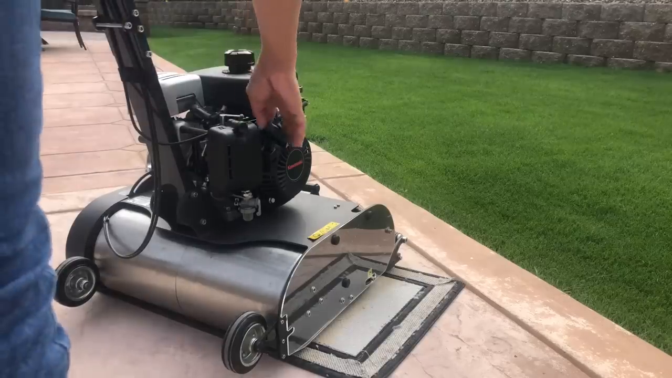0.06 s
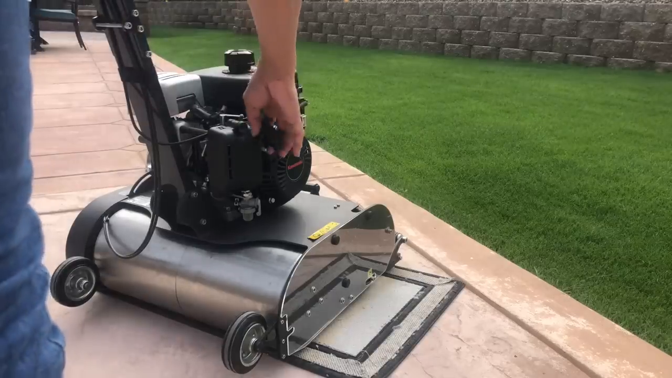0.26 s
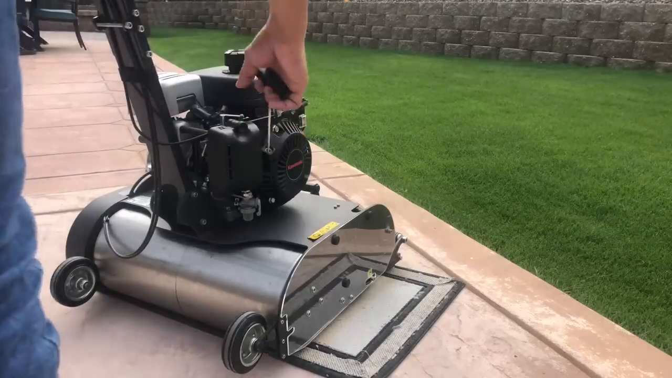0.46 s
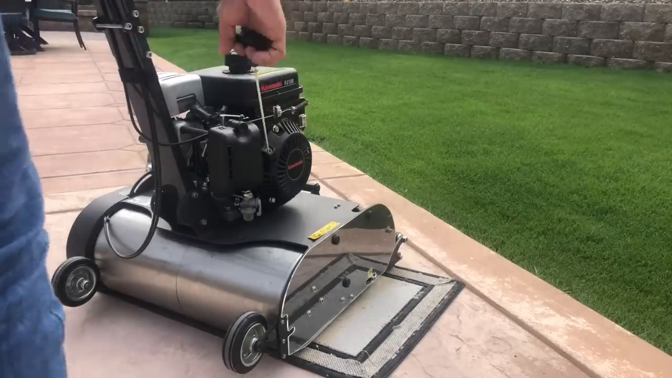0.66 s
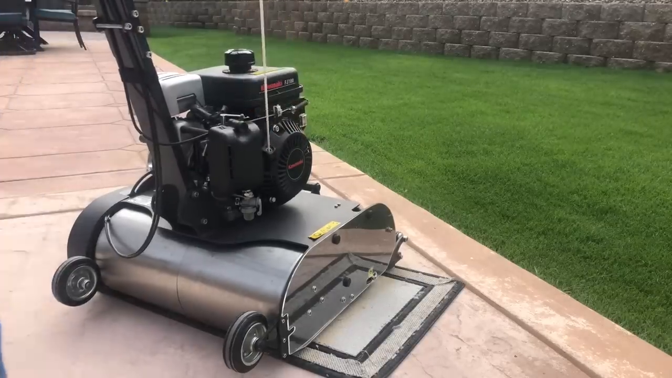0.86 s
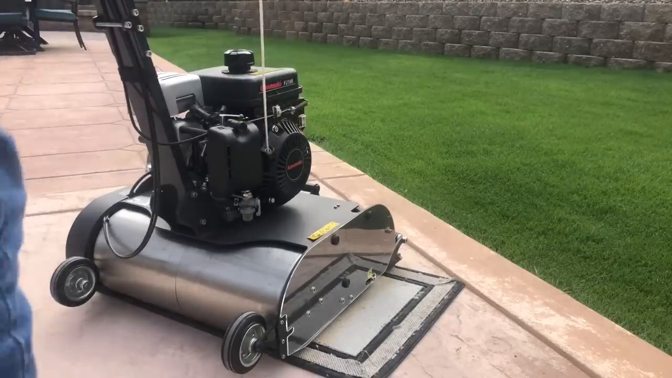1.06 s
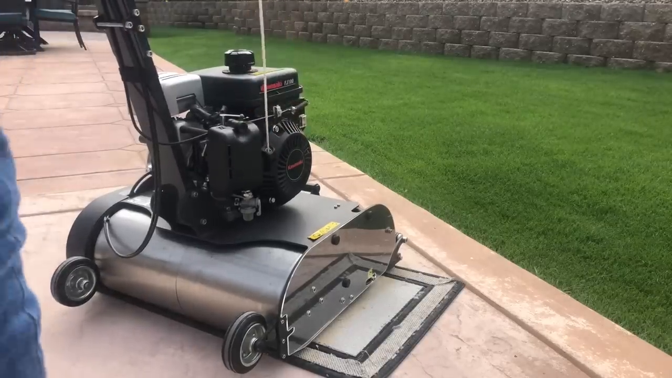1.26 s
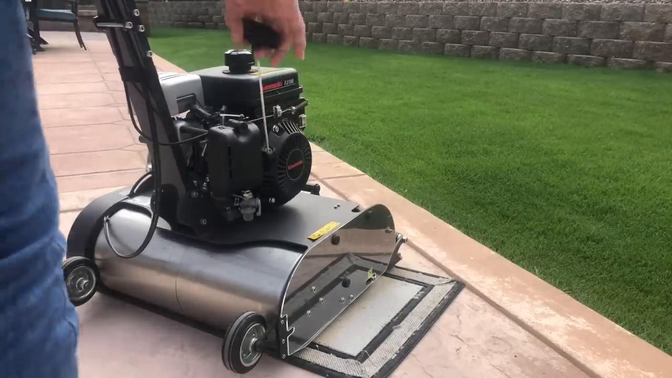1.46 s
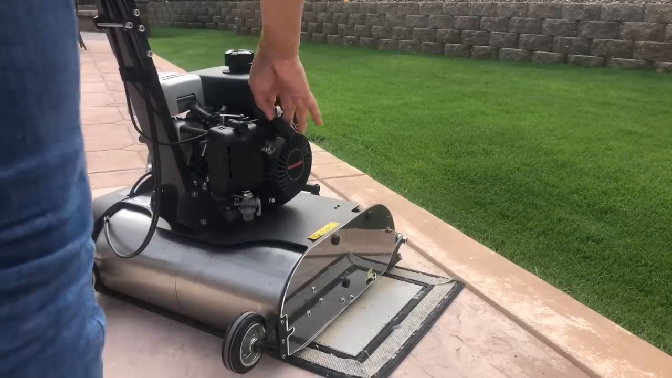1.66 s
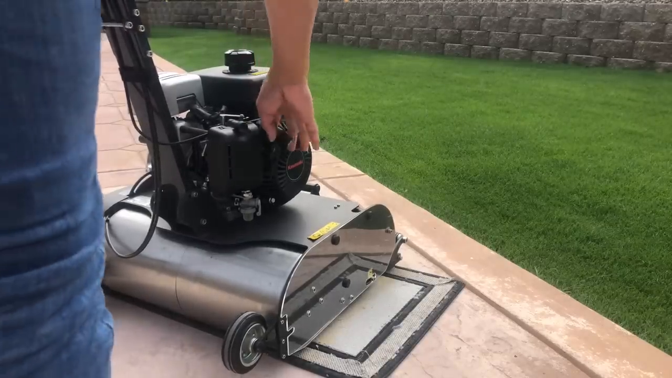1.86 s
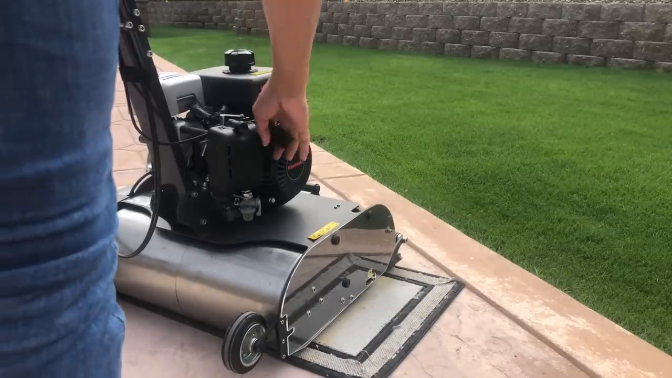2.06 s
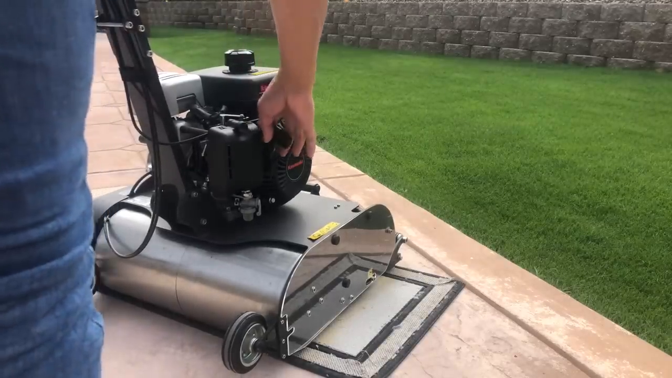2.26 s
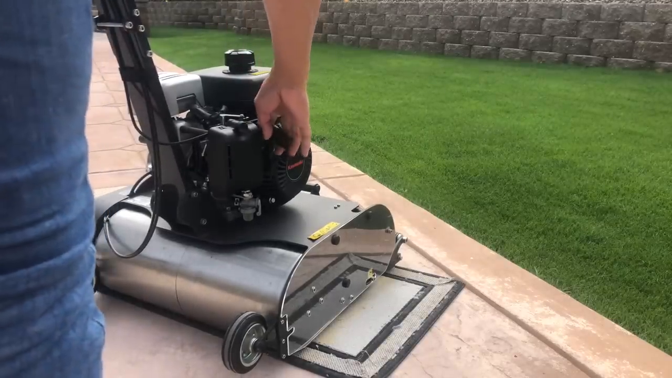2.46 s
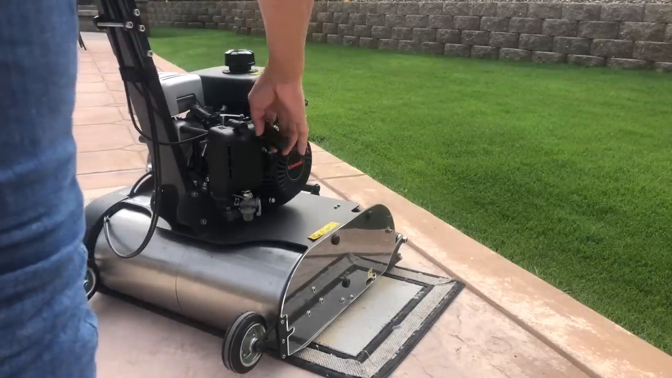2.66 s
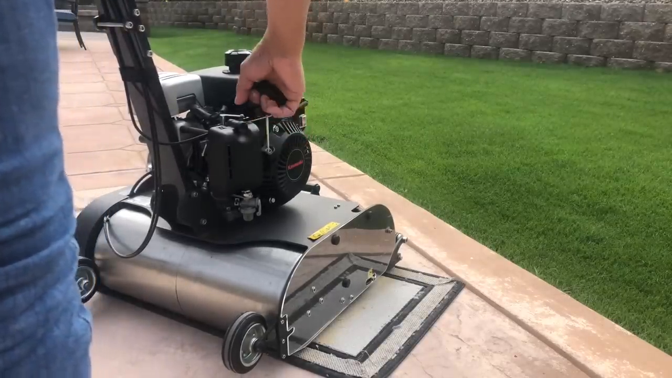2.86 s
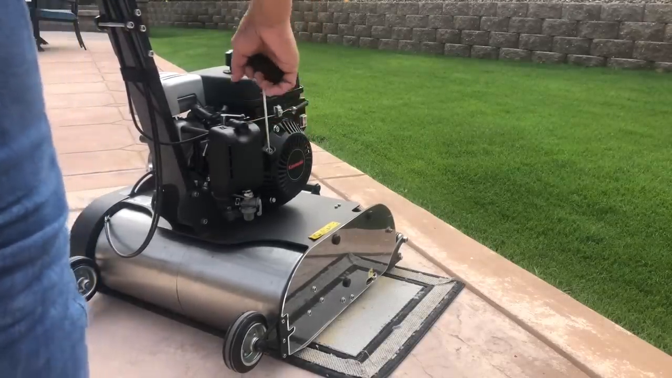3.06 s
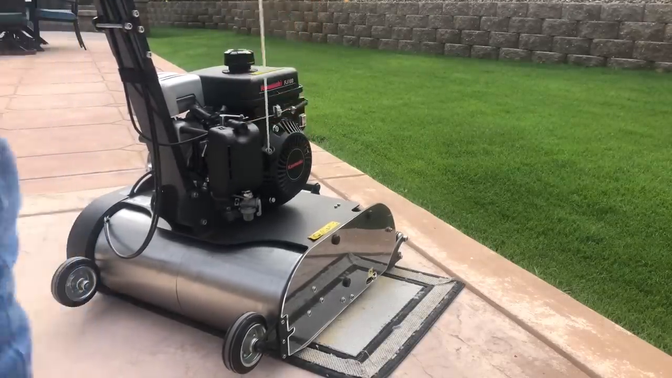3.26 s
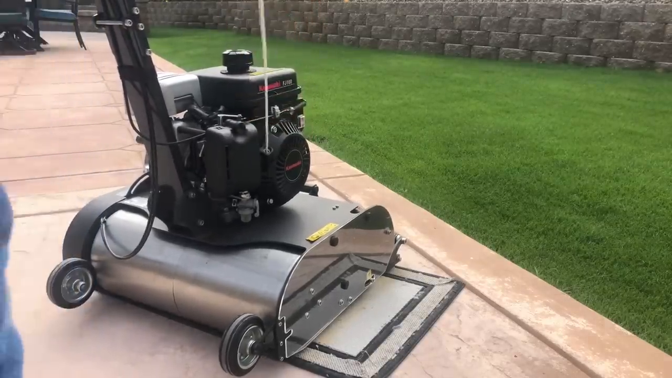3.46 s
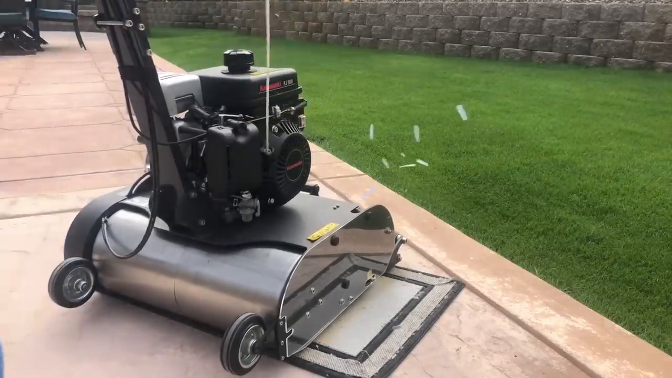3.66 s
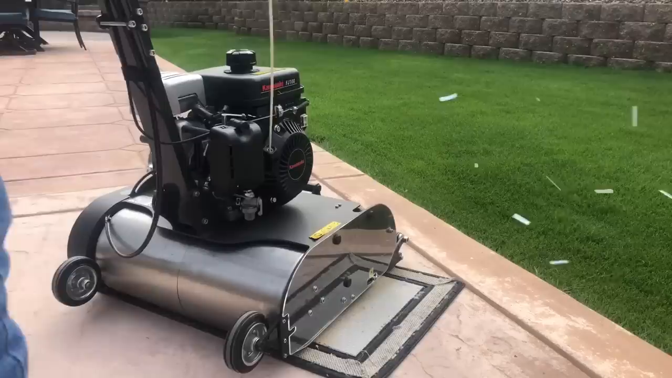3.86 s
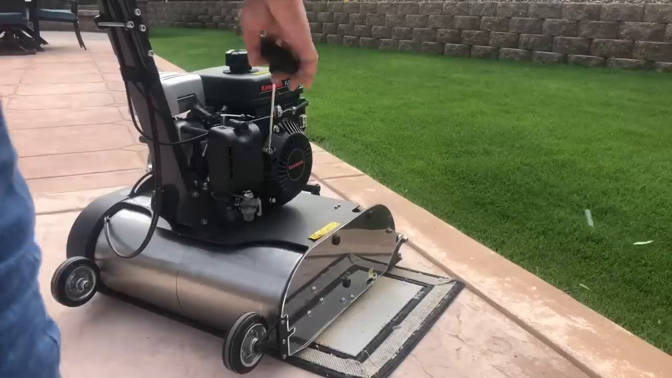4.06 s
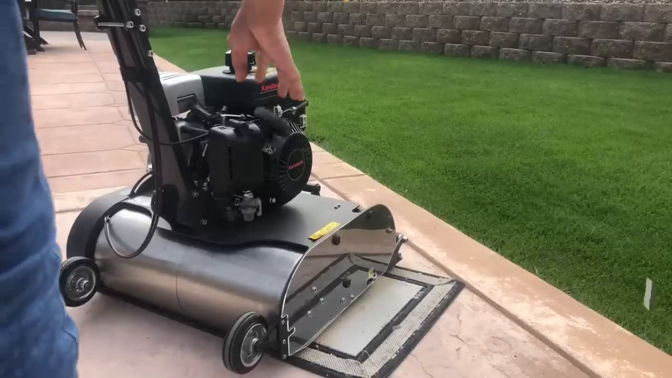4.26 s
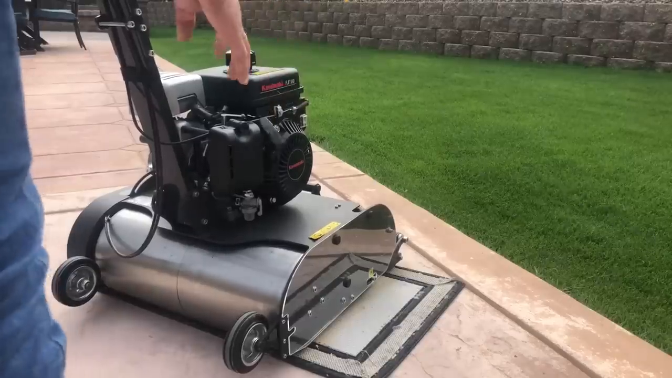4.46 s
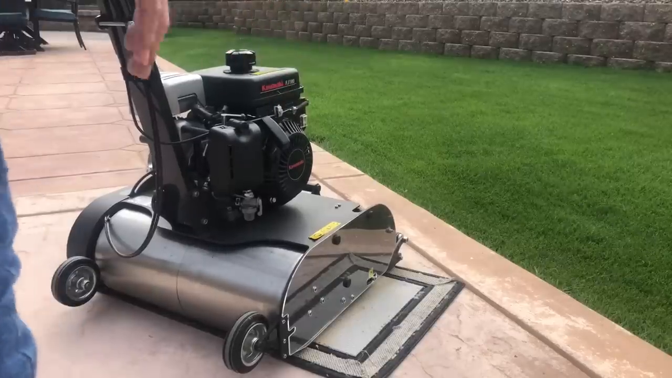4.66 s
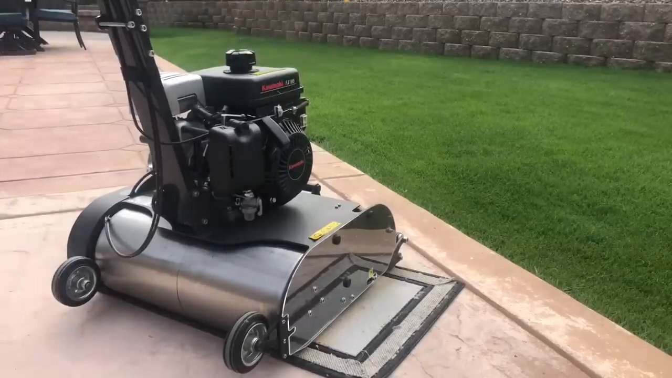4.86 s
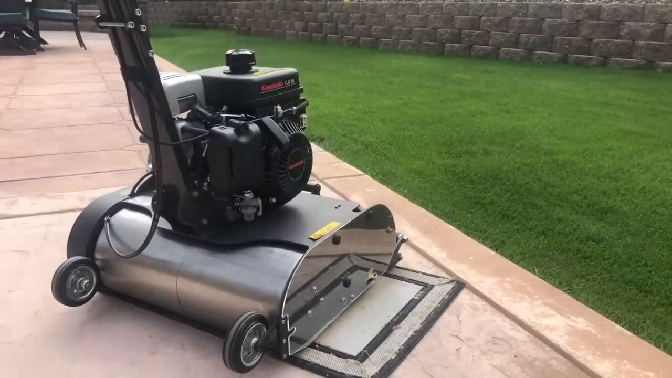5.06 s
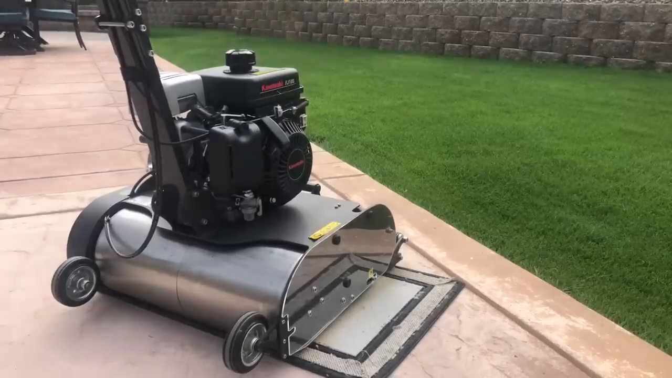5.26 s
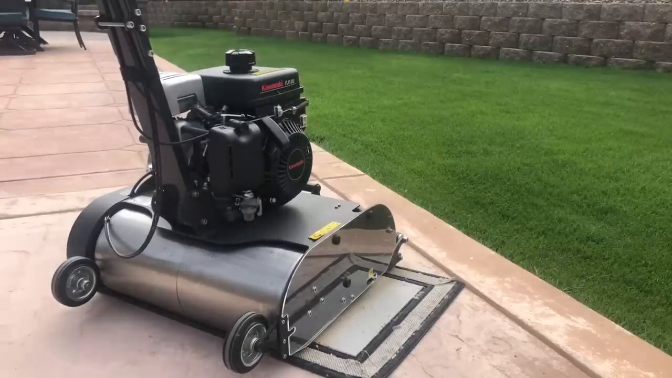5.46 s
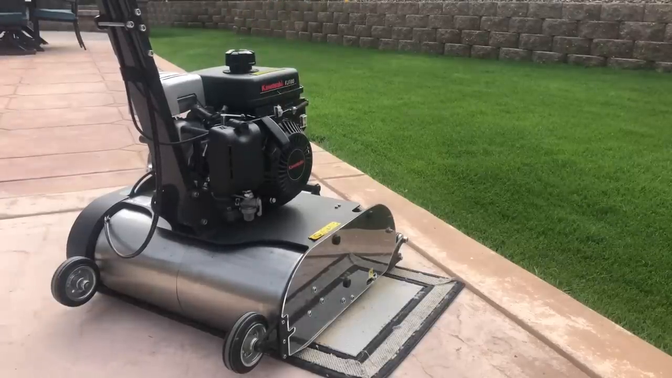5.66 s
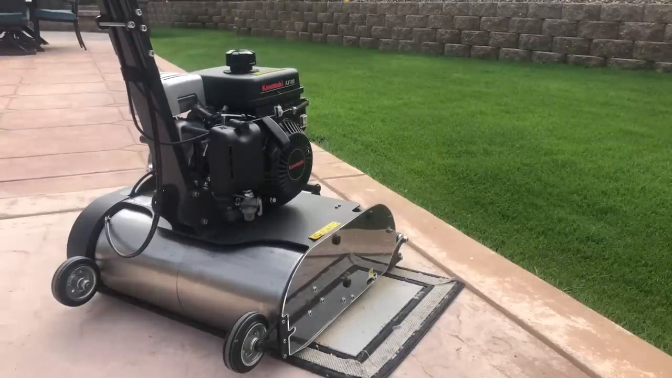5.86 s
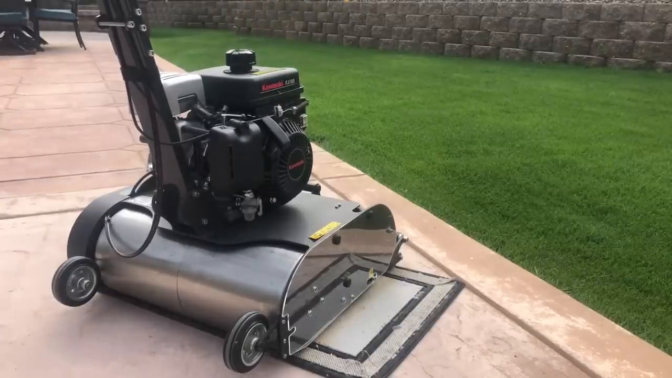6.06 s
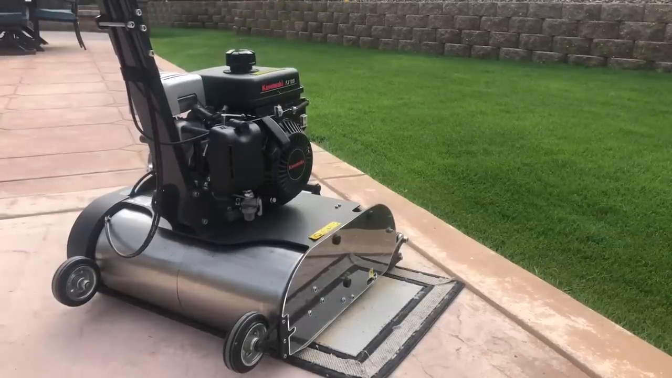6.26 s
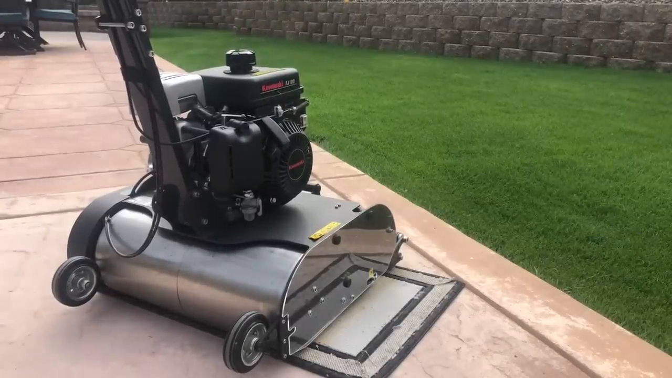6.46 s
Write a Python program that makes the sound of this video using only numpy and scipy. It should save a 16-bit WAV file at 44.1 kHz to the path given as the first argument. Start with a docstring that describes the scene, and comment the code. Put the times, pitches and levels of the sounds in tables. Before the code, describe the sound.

A small petrol mower is started close to the microphone on a paved patio. First come a faint bird chirp, low wind rumble and sharp metal clicks, then a rasping rope pull that fails. After more knocks, a second pull brings the engine to life. It runs loudly with rapid barking beats, the starter handle knocks home, and it eases into a steady, thumping, rattling idle.

```python
"""First you hear wind bumping the microphone over a quiet garden, and a bird chirping far off.
Then a small petrol engine on a paved patio is pulled over twice by its starter rope: the pawls
(small steel catches) click, the rope whirrs, the handle knocks home. At the second pull the engine
catches and fires on nearly every turn, then settles to firing every other turn. Each firing thumps
in the muffler, barks through the metal casing and rings the cooling fins."""
import sys
import numpy as np
from scipy import signal
from scipy.fft import rfft, irfft, next_fast_len
from scipy.io import wavfile
from scipy.ndimage import uniform_filter1d, map_coordinates

SR = 44100
rng = np.random.default_rng(int(sys.argv[2]) if len(sys.argv) > 2 else 0)


def log_audio(samples):
    """Write samples as a 16-bit WAV file to the path given in sys.argv[1]."""
    # one column per channel
    frames = np.atleast_2d(samples).T
    # limit to full scale, then quantise
    limited = np.clip(frames, -1, 1)
    pcm = np.round(limited * 32767).astype(np.int16)
    wavfile.write(sys.argv[1], SR, pcm)


N = 287532


def amp(db):
    """Turns decibels into a gain; amp(-60 * t / x) dies away in x seconds, its ring time."""
    return 10 ** (np.asarray(db) / 20)


def unit(x):
    """Scales x to an average (rms) level of 1."""
    return x / np.sqrt(np.mean(x ** 2) + 1e-20)


def along(points, hz):
    """Reads between (frequency, value) points on a log frequency axis."""
    freqs, values = np.transpose(points)
    return np.interp(np.log(hz + 1), np.log(freqs + 1), values)


def curves(rows):
    """One value per sample for each column after the time."""
    times, *columns = np.transpose(rows)
    return [np.interp(np.arange(N) / SR, times, column) for column in columns]


def wobble(rate):
    """A smooth curve through `rate` random values a second."""
    return map_coordinates(rng.standard_normal(int(N * rate / SR) + 4), [np.arange(N) * rate / SR])


def filtered(x, response):
    """Gives each frequency in x the gain that `response` sets for it."""
    size = next_fast_len(N + SR // 2)
    return irfft(rfft(x, size) * response(np.fft.rfftfreq(size, 1 / SR)), size)[..., :N]


def noise(spectrum, peaks=(), lift_db=0):
    """Noise of level 1 with this tone colour, raised around each (pitch, width, level) peak."""
    def bumps(f):
        return 1 + sum(amp(db + lift_db) / (1 + (2 * (f - hz) / width) ** 2) for hz, width, db in peaks)
    return unit(filtered(rng.standard_normal(N), lambda f: amp(along(spectrum, f)) * bumps(f)))


def add(track, s, piece):
    """Mixes a piece in at s seconds."""
    part = track[round(s * SR):][:len(piece)]
    part += piece[:len(part)]


def swell(s, length):
    """Start time and smooth hump of a puff centred on s."""
    return s - length / 2, np.hanning(max(round(length * SR), 8))


def even(x, span_s):
    """Takes the slow swings of level out of x."""
    return x / np.sqrt(np.abs(uniform_filter1d(x ** 2, size=round(span_s * SR))) + 1e-9)


def glide(rows, waver, overtone_db):
    """A trembling tone and its octave, following (time, pitch, level) rows; silent outside them."""
    hz, db = curves(rows)
    t = np.arange(N) / SR
    phase = 2 * np.pi * np.cumsum(hz * (1 + waver * wobble(200))) / SR
    sounding = (t > rows[0][0]) & (t < rows[-1][0])
    return sounding * amp(db + 3.1 * wobble(80)) * (np.sin(phase) + amp(overtone_db) * np.sin(2 * phase))


def patchy(x, depth_db):
    """Random loud and soft patches in time and pitch, like a loose part that never rattles twice alike."""
    spectrum = signal.stft(x, nperseg=256)[2]
    patches = uniform_filter1d(rng.standard_normal(spectrum.shape), size=3, axis=0)
    patches = uniform_filter1d(patches, size=6, axis=1)
    return unit(signal.istft(spectrum * amp(depth_db * unit(patches)), nperseg=256)[1][:N])


def ring(notes, t, spread_db):
    """One blow on a part: its notes die away, their levels varied at random by spread_db."""
    return sum(amp(db + rng.normal(0, spread_db) - 60 * t / ring_s)
               * np.sin(2 * np.pi * hz * rng.normal(1, 0.0043) * t) for hz, db, ring_s in notes)


# Tone colour of the garden (frequency [Hz], relative level [dB])
HUSH_COLOUR = [(180, -120), (300, 2), (600, 2), (1000, 2.5), (1500, -6), (2500, -16.5), (4500, -16.5),
               (8000, -25.5), (14000, -32), (16000, -40)]
def garden_hush():
    """A faint background hiss that drifts a little in level."""
    return amp(-63.5 + wobble(2.7)) * noise(HUSH_COLOUR)


# Tone colours of the wind's rumble and of a gust's sharp edge (frequency [Hz], relative level [dB])
RUMBLE_COLOUR = [(15, -41.5), (25, -13), (70, -2), (170, -1), (395, -16.5), (522, -37), (568, -43),
                 (700, -32), (910, -64), (1540, -120)]
FLAP_COLOUR = [(150, -120), (300, -1.5), (500, 1), (900, -18), (1500, -43), (2500, -120)]
# The strongest lumps of air (middle time [s], strength [dB], relative flap [dB], length [s])
GUSTS = [(0.048, -54, -16, 0.1), (0.21, -44.5, -23, 0.093), (0.289, -41, -18, 0.08),
         (0.515, -49, -1.5, 0.12), (0.63, -45, -21, 0.092), (1.008, -40, -9.5, 0.34),
         (1.151, -39.5, -12, 0.1), (1.409, -48, -3.5, 0.12), (1.549, -31.5, -12, 0.17),
         (1.645, -35.5, -29, 0.064), (1.723, -35.5, -24, 0.11), (1.856, -30.5, -15.5, 0.071),
         (1.997, -43, -26, 0.06), (2.075, -40.5, -26.5, 0.12), (2.143, -38.5, -19, 0.073),
         (2.244, -29, -2.5, 0.12), (2.329, -38, -11, 0.084), (2.425, -36.5, -20, 0.093),
         (2.645, -43.5, -18.5, 0.1), (2.739, -36.5, -28, 0.1), (3.046, -45, -22, 0.094),
         (3.997, -26, -36, 0.16)]
def wind():
    """Lumps of air hit the microphone over a light breeze; hard gusts flap."""
    breeze_db = -53.5
    push, flap = np.full(N, amp(breeze_db)), np.zeros(N)
    for s, db, flap_db, length in GUSTS:
        start, hump = swell(s, length)
        add(push, start, amp(db - 1.5) * hump)
        add(flap, start, amp(db + flap_db + 2) * hump ** 3)
    rumbling = even(amp(4.5 * wobble(30)) * noise(RUMBLE_COLOUR), span_s=.09)
    flapping = even(amp(5.9 * wobble(60)) * noise(FLAP_COLOUR), span_s=.05)
    return push * rumbling + flap * flapping


# The path of one chirp (time [s], pitch [Hz], relative level [dB])
CHIRP = [(.135, 4500, -73), (.155, 5040, -49), (.19, 4200, -48), (.205, 3820, -46), (.225, 3700, -48),
         (.25, 2850, -51), (.265, 2550, -57), (.285, 2790, -65), (.35, 2750, -80)]
def bird():
    """A nearly pure whistle flicks up, then slides down."""
    return glide(CHIRP, waver=.035, overtone_db=-36)


# Rope and reel rubbing through two pulls and a rewind (time [s], rub level [dB], hiss level [dB])
ROPE_LEVELS = [(0.25, -72, -71.5), (0.7, -70, -75), (0.735, -56, -54), (0.87, -39, -44), (1.0, -40.5, -44),
               (1.14, -48, -53.5), (1.36, -49.5, -55), (1.6, -60, -63.5), (1.9, -61.5, -74),
               (2.2, -79, -85), (2.86, -61.5, -68), (3.0, -58, -62), (3.15, -67, -71), (3.18, -57.5, -57),
               (3.43, -44, -40), (3.6, -90, -90)]
# Short rasps as the rope is handled or drags the engine over
# (middle time [s], level [dB], relative hiss [dB], length [s])
RASPS = [(0.369, -66.5, 9.5, 0.044), (0.48, -59, -12, 0.34), (0.854, -37.5, -7.5, 0.054),
         (0.888, -41, -7, 0.021), (0.941, -31, -2.5, 0.054), (1.403, -45, -14, 0.063),
         (2.337, -39.5, -2, 0.089), (2.372, -55.5, -9, 0.29), (2.641, -49, -6.5, 0.16),
         (3.282, -44, -1, 0.038), (3.318, -35.5, -5, 0.042), (3.357, -33.5, 3, 0.024),
         (3.387, -27.5, -4, 0.053)]
# Tone colours of the low rub and the high hiss (frequency [Hz], relative level [dB])
RUB_COLOUR = [(440, -32.5), (750, 0), (1070, 1.5), (1510, -1), (1660, 4.5), (1870, -4), (2670, -0.5),
              (4170, -14), (5000, -7), (6500, -39), (11000, -120)]
HISS_COLOUR = [(2060, -27), (3500, 4.5), (4240, -3.5), (8210, -5.5), (9810, -11.5), (13000, -10),
               (16000, -20)]
# Notes of the starter's cover, also rung by knocks (pitch [Hz], relative level [dB], ring time [s])
COVER_NOTES = [(845, -12, 0.046), (1077, -0.5, 0.046), (1235, -9, 0.04), (1760, -12.5, 0.041),
               (2340, -14.5, 0.047), (2850, -23, 0.094), (2910, -36, 0.35)]
def rope():
    """The rope rubs with a grainy sound, heard through the hollow cover."""
    rub_level, hiss_level = amp(curves(ROPE_LEVELS))
    for s, db, hiss_db, length in RASPS:
        start, hump = swell(s, length)
        add(rub_level, start, amp(db) * hump)
        add(hiss_level, start, amp(db + hiss_db) * hump)
    grain = unit(amp(3 * wobble(70) + 1.95 * wobble(400)))
    cover_peaks = [(hz, 150, db) for hz, db, _ in COVER_NOTES]
    rub = patchy(noise(RUB_COLOUR, cover_peaks, lift_db=-4.5), depth_db=4)
    return grain * (rub_level * rub + hiss_level * noise(HISS_COLOUR))


# Starter parts hitting each other
# (time [s], strength [dB], relative pawl ring [dB], relative cover ring [dB], relative fizz [dB])
KNOCKS = [(0.384, -51.5, 5, -5, 12), (0.419, -28, 6, -14, -1), (0.454, -30.5, 3.5, -8, -7),
          (0.4834, -19, -9, -8, -8.5), (0.5824, -39.5, -19, -16, -11), (0.894, -17.5, -21.5, -25, -9.5),
          (0.9672, -18.5, -12, -27, -4), (1.0224, -7, -24, -10.5, -10.5), (1.033, -15.5, 3, -25, -15),
          (1.045, -23.5, -14, 0, -22), (1.0731, -21.5, -18, -14, -16), (1.0919, -25, -5, -21, -2.5),
          (1.274, -32.5, -29.5, -8, -31), (1.3162, -28, -6, -28, -9), (1.3877, -36, -26, -1, -24.5),
          (1.4338, -23, -28, -17, -10.5), (1.479, -25, -10.5, -27, -5.5), (1.642, -36, -16, -31, -10),
          (1.652, -32.5, -13, -22, -8), (1.7779, -13, -16, 1.5, -7), (2.3232, -20, -12.5, -12, -6),
          (2.399, -44, -17, 2, -17), (2.5895, -33.5, -25, -8.5, -8), (2.6452, -25, -36.5, -7, -12),
          (2.787, -44, -11, -13, -2), (2.815, -44, -5, -9, -2), (2.8995, -25, -4, -17, -10),
          (2.9244, -26.5, -4, -12, -14), (2.9549, -26.5, -15, -14, -19), (3.3014, -26, -13, -12, -5.5),
          (3.405, -22.5, 0, -4, -4.5), (3.4752, -10, -18.5, -13, -7.5), (4.366, -15, -23, -9, -10.5),
          (4.383, -17, -18, -3, -6)]
# Notes of the steel pawl (pitch [Hz], relative level [dB], ring time [s])
PAWL_NOTES = [(3520, -5.5, 0.035), (3540, -31, 0.34), (7050, 0.5, 0.056), (7270, -0.5, 0.027),
              (9130, -9.5, 0.033), (10650, -10.5, 0.037)]
# Tone colours of a knock's slap and its bright fizz (frequency [Hz], relative level [dB])
SLAP_COLOUR = [(200, -120), (500, -13.5), (1000, -2), (3000, -4), (6000, -6.5), (9000, -23.5),
               (12000, -120)]
FIZZ_COLOUR = [(4000, -120), (6000, -25), (8000, -3.5), (12000, -11.5), (16000, -15.5)]
def starter_knocks():
    """Each contact is a burst of noise that rings the steel pawl and the cover."""
    ringing, slap, fizz = np.zeros((3, N))
    t = np.arange(SR // 4) / SR
    for s, db, pawl_db, cover_db, fizz_db in KNOCKS:
        burst = amp(db - 5 - 60 * t / .057) * (1 - np.exp(-t / 0.0016))
        add(slap, s - .001, burst)
        add(fizz, s - .001, burst * amp(fizz_db))
        build_up = 1 - np.exp(-t / 0.0023)  # the air under the cover takes a moment to get going
        add(ringing, s, amp(db + 3 + cover_db) * build_up * ring(COVER_NOTES, t, spread_db=0))
        add(ringing, s, amp(db - 3 + pawl_db) * ring(PAWL_NOTES, t, spread_db=2.5))
    slap *= patchy(noise(SLAP_COLOUR), depth_db=4.5)
    fizz *= patchy(noise(FIZZ_COLOUR), depth_db=3)
    return ringing + slap + fizz


# The moment the rope jerks tight (time [s], strength [dB])
ROPE_JERK = (.7085, -37)
def rope_pop():
    """The rope pops as it snaps tight; the pitch drops as it settles."""
    s, db = ROPE_JERK
    out, t = np.zeros(N), np.arange(SR // 4) / SR
    level = amp(db - 60 * t / 0.057) * (1 - np.exp(-t / 0.00058))
    add(out, s, level * np.sin(9 * np.log(1 + t / 0.00051)))
    return out


# When each pull speeds up (start time [s])
WHINE_STARTS = [0.745, 3.235]
def reel_whine(s):
    """The reel whines as it speeds up: the pitch climbs while the level rises, holds and falls."""
    start_hz, climb_hz_per_s, hold_db = 920, 6700, -45
    edge_s, hold_s = .02, .05
    elapsed = np.cumsum([0, edge_s, hold_s, edge_s])
    hz = start_hz + climb_hz_per_s * elapsed
    db = hold_db - 24 * np.array([1, 0, 0, 1])
    return glide(np.transpose([s + elapsed, hz, db]), waver=.05, overtone_db=-5.5)


# How hard the engine rattles (time [s], base level [dB])
RATTLE_LEVELS = [(3.28, -130), (3.38, -43), (3.46, -30), (3.7, -32.5), (4.0, -35), (4.6, -36), (6.52, -33)]
# Tone colours of the clatter and the frame's low drone (frequency [Hz], relative level [dB])
CLATTER_COLOUR = [(210, -19), (350, -0.5), (557, -3.5), (857, -2.5), (2130, -6.5), (3390, -14), (4040, -17),
                  (5570, -16), (7920, -25), (15000, -34.5), (16000, -34)]
DRONE_COLOUR = [(25, -120), (45, -5), (80, -9), (130, -3.5), (200, -2.5), (300, -0.5), (450, -14),
                (700, -120)]
# Pitches the casing boosts, in clatter and bark (pitch [Hz], width [Hz], relative level [dB])
CASING_PEAKS = [(668, 30, -7), (851, 40, -3.5), (2086, 19, -2), (2674, 57, -6), (2835, 39, -1),
                (3230, 55, -7), (3624, 330, -6.5), (4870, 34, 2.5), (5170, 34, 5.5), (7000, 630, -3.5),
                (7640, 71, -4), (8450, 64, -1.5), (11200, 110, -9), (12000, 150, -11)]
def engine_rattle(fired):
    """The engine clatters and its frame drones on the paving, both harder after each firing."""
    shake, t = np.ones(N), np.arange(SR // 5) / SR
    for s, _ in fired:
        add(shake, s, 0.5 * amp(-60 * t / 0.4))
    db = curves(RATTLE_LEVELS)[0]
    flicker_db = 1.3 * wobble(80) + 1.04 * wobble(7)
    clatter = amp(db + flicker_db) * noise(CLATTER_COLOUR, CASING_PEAKS, lift_db=-1.5)
    drone = amp(db - 7) * shake * 1 * noise(DRONE_COLOUR)
    return shake * clatter + drone


# The engine's turning, which slows as it settles (time [s], turns since the first firing [count])
TURNS_MADE = [(3.4542, 0), (3.5456, 2), (3.602, 3), (3.6522, 4), (3.7927, 7), (4.2331, 16), (4.4853, 21),
              (4.6401, 24), (4.9546, 30), (5.475, 40), (5.896, 48), (6.3236, 56), (6.481, 59)]
# How hard the fuel fires (time [s], strength [dB], change on odd turns [dB])
FIRING_STRENGTH = [(3.45, -7.5, 0), (3.62, -10, 3), (3.95, -13, 0), (4.12, -12.5, -2.5), (4.33, -14.5, 0.5),
                   (4.53, -11, -2.5), (4.8, -11, -7.5), (5.06, -8, -9), (6.52, -8.5, -9)]
def engine_turns():
    """Gives (time, strength) for the turns that fire, and the times of the turns that miss."""
    early_misses, settled_turn = (1, 6, 8, 15, 25), 29
    times, made = np.transpose(TURNS_MADE)
    turn = np.arange(made[-1] + 1)
    when = np.interp(turn, made, times)
    odd = turn % 2 == 1
    missed = np.isin(turn, early_misses) | (odd & (turn >= settled_turn))
    at, strength_db, odd_db = np.transpose(FIRING_STRENGTH)
    db = np.interp(when, at, strength_db) + odd * np.interp(when, at, odd_db)
    db += rng.normal(0, 0.52, len(turn))
    return list(zip(when[~missed], db[~missed])), when[missed]


# Muffler notes for a fired and a missed turn (delay [s], pitch [Hz], level [dB], rise time [s])
FIRED_NOTES = [(-.005, 87, -40.5, .02), (.0025, 163, -30, .012), (.0125, 290, -26.5, .0032),
               (.014, 850, -38, .005)]
MISSED_NOTES = [(-.005, 58, -41, .016), (.012, 125, -27.5, .0055), (.0148, 270, -24, .002)]
def muffler(out, s, fires):
    """A puff of gas swells and fades in each of the muffler's notes."""
    t = np.arange(SR // 8) / SR
    for delay, hz, db, rise in FIRED_NOTES if fires else MISSED_NOTES:
        start = s + delay + rng.normal(0, 0.00041)
        level = amp(db + rng.normal(0, 0.79)) * t / rise * np.exp(1 - t / rise)
        add(out, start, level * np.sin(2 * np.pi * hz * rng.normal(1, 0.012) * t))


# Tone colour of the engine's bark (frequency [Hz], relative level [dB])
BARK_COLOUR = [(350, -45), (600, -6), (2720, -5), (3340, -3), (3680, -1.5), (4400, -7.5), (5050, -4),
               (5630, -6.5), (6830, -6), (16000, -9)]
# Notes of the cooling fins (pitch [Hz], relative level [dB], ring time [s])
FIN_NOTES = [(2100, -18, .05), (2734, -11, .06), (3560, 2.5, .04), (4900, -4.5, 0.095), (5250, -4, 0.14),
             (6900, 4, .03), (8370, -5, 0.063)]
def engine_beats(fired, missed):
    """Fired turns bark through the casing; missed ones pump air and rattle valves. Both ring the fins."""
    gas, fins, bark = np.zeros((3, N))
    t = np.arange(SR // 5) / SR
    crack, buzz = amp(-60 * t / 0.067), amp(-23 - 60 * t / 0.25)
    for s, db in fired:
        muffler(gas, s, fires=True)
        add(bark, s - .002, amp(db - 7.5) * (crack + buzz) * (1 - np.exp(-t / 0.0011)) ** 2)
        add(fins, s, amp(db - 21) * (1 - np.exp(-t / .002)) * ring(FIN_NOTES, t, spread_db=3))
    early_rattle = amp(-60 * t / .1)
    late_rattle = amp(-60 * t / 0.089) * (1 - np.exp(-t / 0.0014))
    for s in missed:
        muffler(gas, s, fires=False)
        add(fins, s + .011, amp(-39.5) * ring(FIN_NOTES, t, spread_db=3.5))  # a valve shuts
        add(bark, s + rng.normal(.0049, .0018), amp(rng.normal(-34, 1.6)) * late_rattle)
        add(bark, s + rng.normal(-.02, .003), amp(rng.normal(-37, 1.5)) * early_rattle)
    roughness = amp(2.4 * wobble(250))
    casing = patchy(noise(BARK_COLOUR, CASING_PEAKS, lift_db=6), depth_db=1.9)
    return gas + fins + bark * even(roughness * casing, span_s=0.019)


# How long the patio's echo lasts (frequency [Hz], ring time [s])
ECHO_TIMES = [(200, 0.39), (2000, 0.22), (10000, .15)]
def patio_echo(x):
    """Walls and paving throw the sound back; each frequency dies at its own speed."""
    hz, t, spectrum = signal.stft(rng.standard_normal(SR // 2), SR, nperseg=256)
    fade = amp(-60 * t / along(ECHO_TIMES, hz)[:, None])
    tail = signal.istft(spectrum * fade, SR, nperseg=256)[1]
    thin = filtered(x, lambda f: f ** 2 / (f ** 2 + 500 ** 2))  # low garden walls return little bass
    delayed = np.pad(thin, (300, 0))
    return signal.fftconvolve(delayed, tail / np.linalg.norm(tail))[:N]


def scene():
    """The engine close by, the bird mostly as echo, wind and garden hush."""
    starter = rope() + rope_pop() + sum(reel_whine(s) for s in WHINE_STARTS) + starter_knocks()
    fired, missed = engine_turns()
    machine = starter + engine_beats(fired, missed) + engine_rattle(fired)
    chirp, hush = bird(), garden_hush()
    echo = patio_echo(amp(-13) * machine + amp(-3) * chirp)
    return (machine + 0.52 * chirp + echo + wind() + hush)[None]


def record(dry):
    """The microphone drops the deepest bass and the very highest treble."""
    bass_hz, top_hz = 32, 15800
    def response(hz):
        treble_cut = np.clip((top_hz - hz) / 300 + .5, 0, 1)
        return treble_cut * hz ** 4 / (hz ** 4 + bass_hz ** 4)
    return filtered(dry, response)


dry = scene()
out = record(dry)
log_audio(out)
```